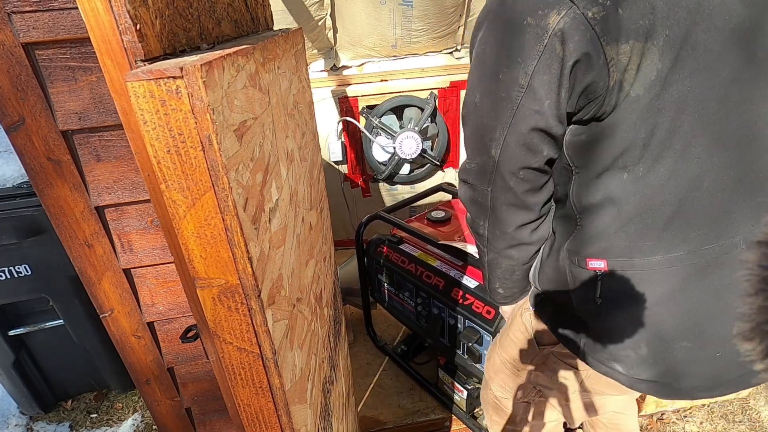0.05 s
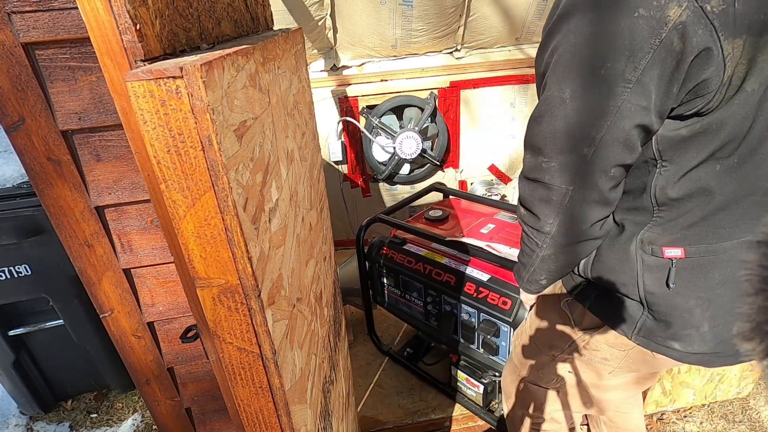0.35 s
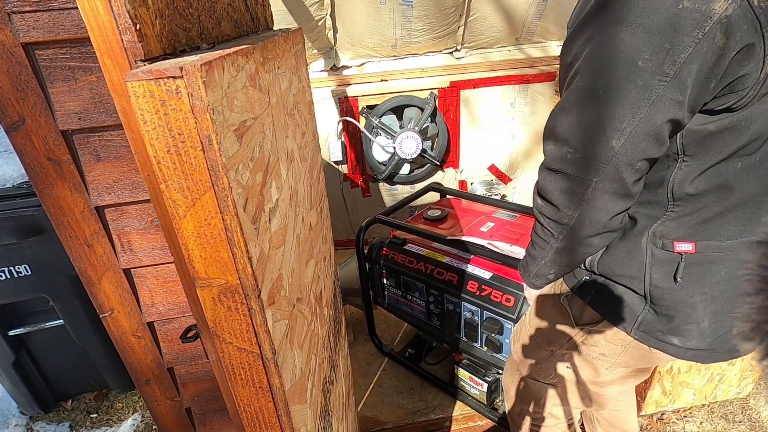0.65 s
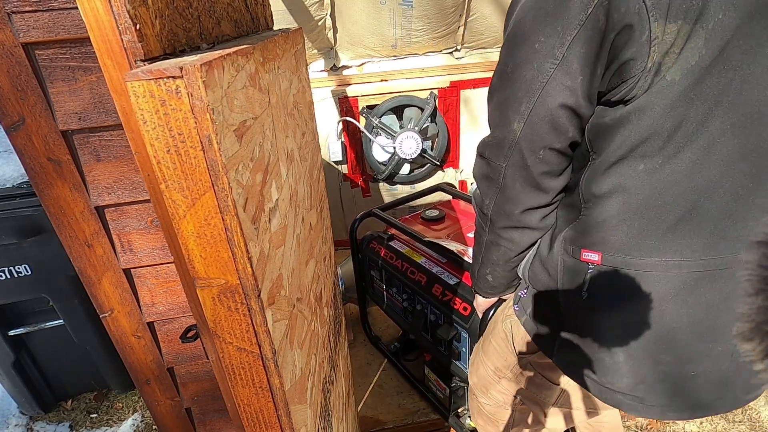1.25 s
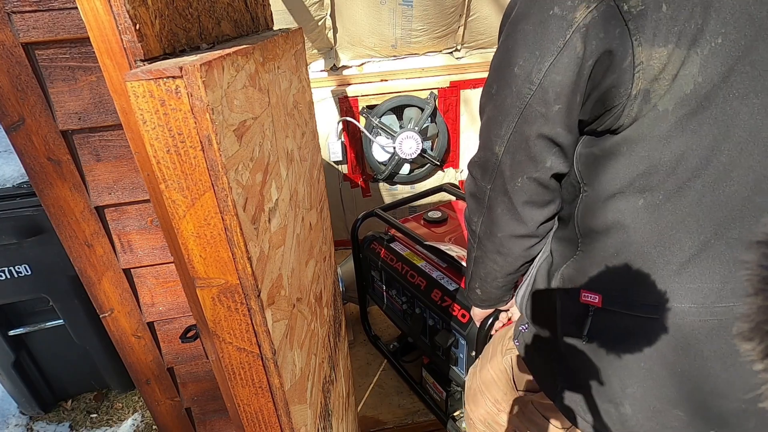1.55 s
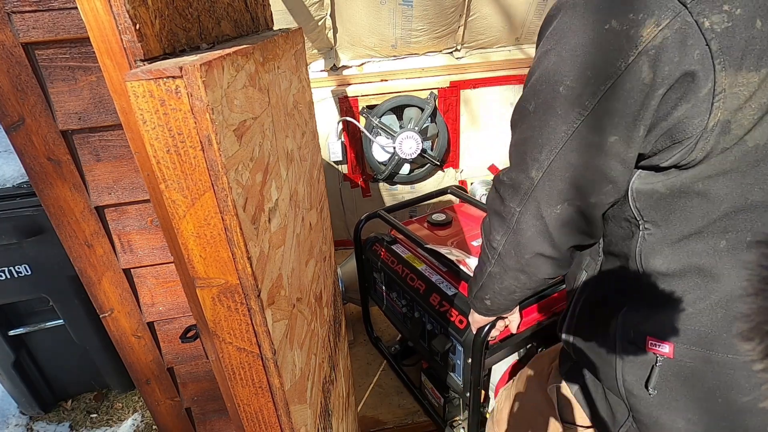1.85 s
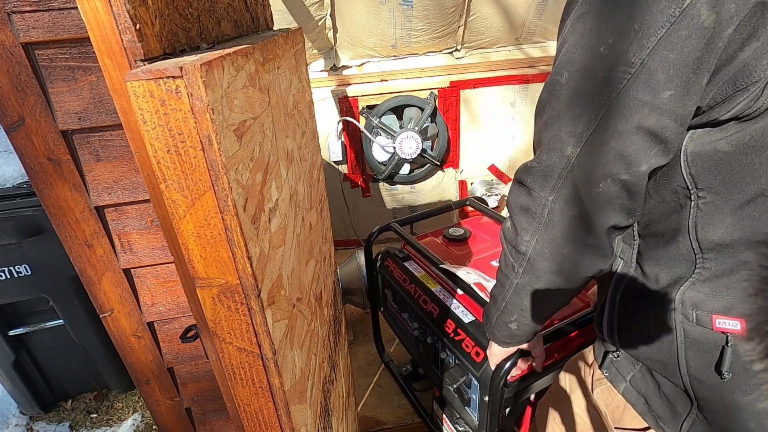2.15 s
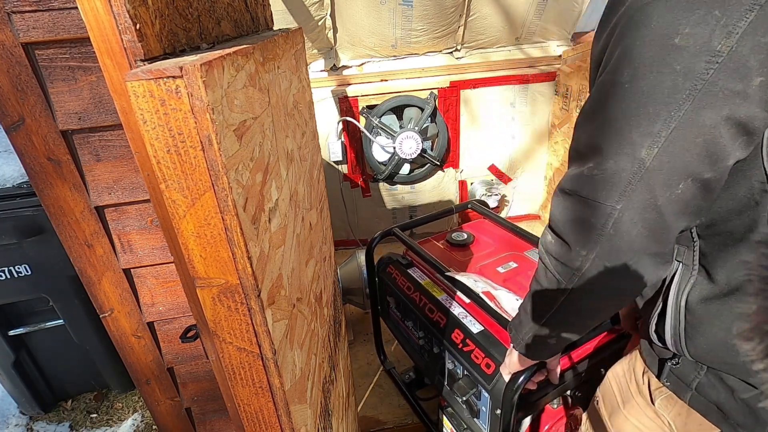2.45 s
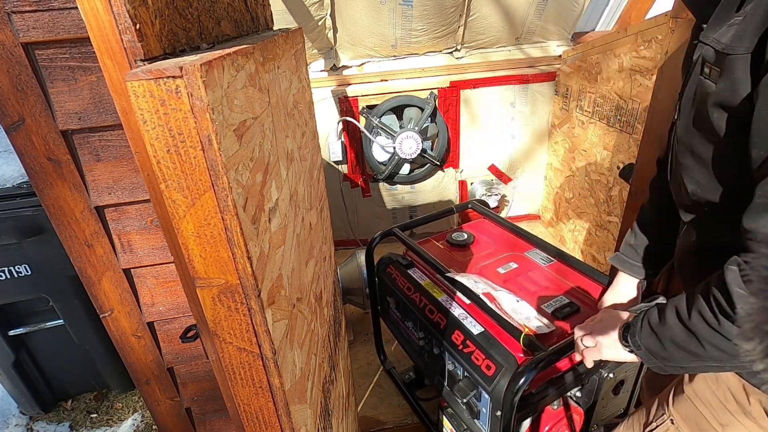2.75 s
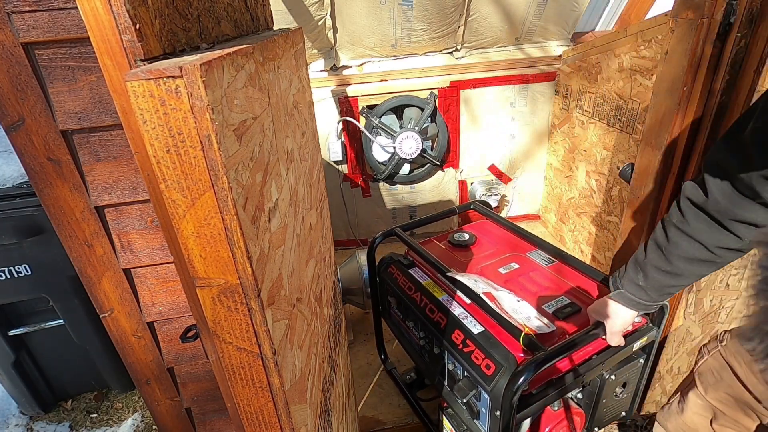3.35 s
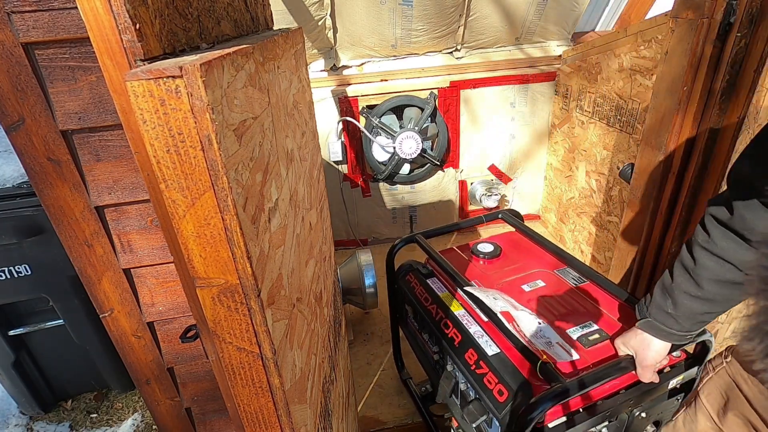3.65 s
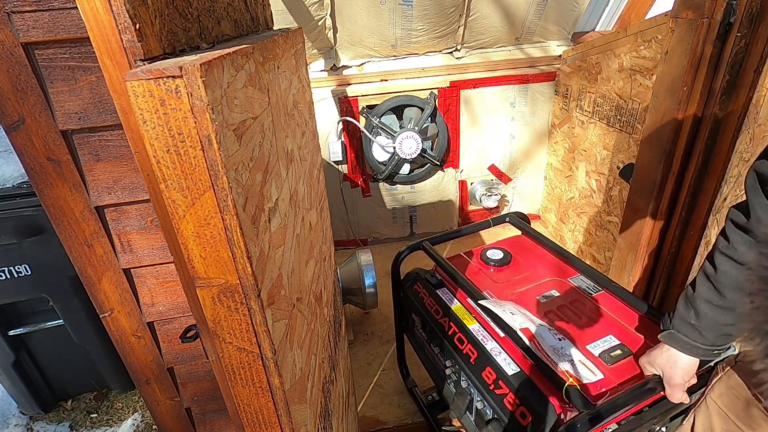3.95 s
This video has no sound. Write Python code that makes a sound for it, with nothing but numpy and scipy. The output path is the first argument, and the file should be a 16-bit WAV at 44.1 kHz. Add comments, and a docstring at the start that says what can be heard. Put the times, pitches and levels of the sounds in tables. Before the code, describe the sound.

A heavy generator is dragged over a gritty wooden floor. Boots shuffle and the steel frame clanks, then comes a loud juddering scrape with a thud, and a softer second drag. Close in a small shed, with light wind.

```python
"""A small shed with a gritty wooden floor, where a heavy portable generator is shifted, then dragged twice. Its
feet stick and slip, juddering on the boards and crushing grit; a tube of the frame squeaks as the first drag
ends. The steel frame clanks and rings hollow, the floor thuds, boots shuffle and scuff, a jacket rustles. The
close walls add a short reverb, and a light wind sways the air at the microphone."""
import sys
import numpy as np
from scipy import signal
from scipy.fft import rfft, irfft, next_fast_len
from scipy.io import wavfile
from scipy.ndimage import uniform_filter1d

SR = 44100
rng = np.random.default_rng(int(sys.argv[2]) if len(sys.argv) > 2 else 0)


def int16_out(signal):
    """Quantize to a 16-bit WAV file."""
    q = np.round(np.clip(np.atleast_2d(signal).T, -1, 1) * 32767)
    wavfile.write(sys.argv[1], SR, q.astype(np.int16))


N = 176400
HIT_SAMPLES, SHARP_ATTACK_S = SR // 3, 0.0003


def amp(db):
    return 10 ** (np.asarray(db) / 20)


def unit(x):
    return x / np.sqrt(np.mean(x ** 2) + 1e-20)


def along(points, hz):
    """Read a curve of (f/Hz, value) points on a log frequency axis."""
    freqs, values = np.transpose(points)
    return np.interp(np.log(hz + 1), np.log(freqs + 1), values)


def coloured(x, colour):
    """Minimum-phase filter whose gain in dB is colour(hz)."""
    size = 2 * next_fast_len(len(x) // 2 + 4096)
    gain = amp(colour(np.fft.rfftfreq(size, 1 / SR)))
    cepstrum = irfft(np.log(gain + 1e-6))
    cepstrum[1:size // 2] *= 2
    cepstrum[size // 2 + 1:] = 0
    return irfft(rfft(x, size) * np.exp(rfft(cepstrum)))[:len(x)]


def eq(x, curve):
    """Filter by a curve of (f/Hz, gain/dB) points."""
    return coloured(x, lambda hz: along(curve, hz))


def hump(hz, centre_hz, steep):
    """A broad resonance in dB."""
    ratio = (hz + 1) / centre_hz
    return -steep * np.log10((ratio + 1 / ratio) / 2)


def swell(s, rise, fall, hold=0, bend=1):
    """An envelope, full from s for the hold, 20 dB down a rise before and a fall after."""
    t = np.arange(N) / SR
    away = np.clip(np.maximum((s - t) / rise, (t - s - hold) / fall), 0, 10)
    return amp(-20 * away ** bend)


def add(track, s, db, hit):
    """Lay a hit at time s; db is its level as if all its energy fell in 20 ms."""
    part = track[int(s * SR):][:len(hit)]
    part += (amp(db) * hit * np.sqrt(SR / 50 / np.sum(hit ** 2)))[:len(part)]


# Decay of the room: f/Hz, t60/s
SHED_DECAY = [(300, 0.15), (14000, 0.054)]
def shed(x, wet_db):
    """Direct sound plus the short answer of the close wooden walls."""
    hz, t, noise = signal.stft(rng.standard_normal(HIT_SAMPLES), SR, nperseg=256)
    decay = amp(-60 * t / along(SHED_DECAY, hz)[:, None])
    tail = signal.istft(noise * decay, SR, nperseg=256)[1]
    tail[:SR // 600] = 0  # pre-delay
    return x + amp(wet_db) * signal.fftconvolve(x, tail / np.linalg.norm(tail))[:len(x)]


def grains(per_s, spread_db, size=N):
    """Random tiny impacts of scattered strength."""
    clicks = (rng.random(size) < per_s / SR) * rng.choice([-1, 1], size)
    return clicks * amp(spread_db * rng.standard_normal(size))


def patter(contacts, colour, wet_db):
    """Several contact points, each with its own path through the shed; rms 1."""
    return unit(coloured(sum(shed(x, wet_db) for x in contacts), colour))


def friction(curve, per_s, spread_db, pressure=1):
    """A rubbing texture: grains under three contact points."""
    contacts = [pressure * grains(per_s, spread_db) for _ in range(3)]
    return patter(contacts, lambda hz: along(curve, hz), wet_db=0)


def burst(per_s, t60, attack_s=SHARP_ATTACK_S):
    """Many tiny impacts that die away."""
    t = np.arange(HIT_SAMPLES) / SR
    return grains(per_s, spread_db=6, size=len(t)) * amp(-60 * t / t60) * (1 - np.exp(-t / attack_s))


def ringing(modes, attack_s):
    """Damped modes, a little different in level and tuning at each blow."""
    t = np.arange(HIT_SAMPLES) / SR
    ring = sum(amp(db + rng.normal(0, 0.66) - 60 * t / t60)
               * np.sin(2 * np.pi * hz * rng.normal(1, 0.011) * t) for hz, db, t60 in modes)
    return ring * (1 - np.exp(-t / attack_s))


# Tone of the air bed and of the wind: f/Hz, gain/dB
AIR_EQ = [(60, 9), (750, 2), (2500, -6), (8000, -11.5), (16000, -12)]
WIND_EQ = [(2, 8.5), (8, -9), (33, -20), (70, -47.5), (600, -105)]
# Slow swells and lulls of the wind: t/s, gain/dB
WIND_SWAY = [(1.0, 2.5), (3.1, -5.5), (3.7, -0.5)]
def breeze(air_db=-50, wind_db=-24.5):
    """A faint bed of air, with slow wind pressure on the microphone underneath."""
    air = unit(eq(rng.standard_normal(N), AIR_EQ))
    wind = unit(eq(rng.standard_normal(N), WIND_EQ))
    gust_db = np.interp(np.arange(N) / SR, *np.transpose(WIND_SWAY))
    return amp(air_db) * air + amp(wind_db + gust_db) * wind


# Blows on the floor: t/s, level/dB, f/Hz
THUD_CUES = [(0.123, -32.5, 254), (0.217, -39.5, 190), (1.66, -39, 178), (1.887, -35, 280),
             (2.162, -20.5, 268.5), (2.174, -20, 83)]
# Low modes of the floor: f/Hz, level/dB, t60/s
FLOOR_MODES = [(53, -3, 0.17), (183.8, -6.5, 0.21)]
def floor_thuds():
    """Dull blows set the floor booming, most when pitched near its upper mode."""
    track = np.zeros(N)
    for s, db, pitch in THUD_CUES:
        blow = coloured(signal.unit_impulse(HIT_SAMPLES), lambda hz: hump(hz, pitch, steep=69))
        add(track, s, db, shed(blow, wet_db=1))
        boom_db = db + 2.5 + hump(FLOOR_MODES[1][0], pitch, steep=170)
        add(track, s, boom_db, ringing(FLOOR_MODES, attack_s=0.0136))
    return track


# Rattles of the frame: t/s, level/dB, ring relative to rattle/dB
CLANK_CUES = [(0.132, -42.5, -6.5), (1.054, -32.5, -22), (1.08, -23.5, -13), (1.11, -27.5, -20),
              (1.643, -53.5, 10), (2.014, -21, -9.5), (2.064, -22, -22), (2.152, -21.5, -27),
              (2.222, -19.5, -13), (3.657, -25.5, -21), (3.82, -29.5, 4)]
# Tone of rattling steel: f/Hz, gain/dB
STEEL_EQ = [(100, -7), (500, 1.5), (1600, -3), (3300, -11), (16000, -22)]
# Modes of the tubes: f/Hz, level/dB, t60/s
TUBE_MODES = [(2460, -2.5, 0.058), (2860, 0, 0.042), (3213, 6, 0.037), (3694, -2, 0.083)]
def frame_clanks():
    """The steel frame rattles, and its tubes ring brightly on top."""
    track = np.zeros(N)
    for s, db, ring_db in CLANK_CUES:
        rattle = eq(burst(per_s=5000, t60=0.085, attack_s=0.00089), STEEL_EQ)
        add(track, s, db, shed(rattle, wet_db=-2))
        tubes = ringing(TUBE_MODES, attack_s=0.0007)
        chatter = burst(per_s=2300, t60=0.05, attack_s=0.0032)
        ring = signal.fftconvolve(tubes, chatter)[:HIT_SAMPLES]
        add(track, s, db + ring_db, shed(ring, wet_db=-2))
    return track


# Arm moves: peak t/s, rise/s, fall/s, level/dB
RUSTLE_CUES = [(0.309, 0.011, 0.05, -48.5), (0.759, 0.04, 0.18, -46.5), (1.812, 0.37, 0.21, -46),
               (2.88, 0.27, 0.46, -50)]
# Sandy hiss, for cloth and for sand underfoot: f/Hz, gain/dB
SAND_EQ = [(200, 10), (900, -3.5), (2500, 4), (8000, -3.5), (16000, -10.5)]
def jacket_rustles():
    """Stiff cloth slides over itself with a fine hiss."""
    envelope = sum(amp(db) * swell(s, rise, fall) for s, rise, fall, db in RUSTLE_CUES)
    return envelope * friction(SAND_EQ, per_s=2100, spread_db=10)


# Weight shifts: peak t/s, rise/s, fall/s, boards level/dB, sand level/dB
SHUFFLE_CUES = [(0.49, 0.16, 0.21, -36, -43), (0.96, 0.16, 0.14, -42, -44), (1.18, 0.54, 0.27, -37, -44.5),
                (1.369, 0.067, 0.04, -39.5, -39.5), (1.504, 0.12, 0.13, -32, -44.5)]
# Tone of rubbed boards: f/Hz, gain/dB
BOARD_EQ = [(60, -2.5), (230, 1), (650, -3.5), (1400, -14), (12000, -30.5)]
def shuffles():
    """Small shifts of weight rub the boards and roll sand over them."""
    boards = friction(BOARD_EQ, per_s=230, spread_db=6)
    sand = friction(SAND_EQ, per_s=1100, spread_db=7)
    return sum(swell(s, rise, fall, bend=1.92) * (amp(boards_db) * boards + amp(sand_db) * sand)
               for s, rise, fall, boards_db, sand_db in SHUFFLE_CUES)


# Breaking grit: t/s, level before trim/dB, crumble t60/s, f/Hz
CRACK_CUES = [(0.413, -36.5, 0.013, 3280), (0.473, -33.5, 0.016, 3870), (0.509, -33, 0.032, 3850),
              (0.716, -37, 0.022, 11000), (0.909, -33.5, 0.014, 4930), (0.978, -26.5, 0.029, 2900),
              (1.08, -29.5, 0.046, 1670), (1.415, -29.5, 0.17, 7600), (1.529, -32.5, 0.021, 2840),
              (1.643, -33.5, 0.0168, 3800), (1.975, -38, 0.0045, 5000), (2.228, -20.5, 0.14, 6500),
              (2.286, -22, 0.049, 6950), (2.477, -34.5, 0.0028, 6500), (2.781, -41, 0.0049, 1390),
              (3.163, -36.5, 0.025, 9100), (3.47, -36.5, 0.0194, 6600)]
def grit_cracks(trim_db=-4.5):
    """Grit breaks under the load: a sharp snap, then a tail of crumbs."""
    track = np.zeros(N)
    snap = 2 * signal.unit_impulse(HIT_SAMPLES)
    for s, db, crumble_s, pitch in CRACK_CUES:
        colour = lambda hz: hump(hz, pitch, steep=29) - 10 * np.log10(1 + (hz / 9000) ** 2)
        crack = coloured(snap + burst(per_s=6500, t60=crumble_s), colour)
        add(track, s, db + trim_db, shed(crack, wet_db=-0.5))
    return track


# Body of the frame on the boards: f/Hz, width/Hz, level/dB
FRAME_MODES = [(335.6, 28, 2.5), (417, 106, 4), (540, 50, -3.5), (715, 100, 0), (937, 35, -9),
               (1227, 92, -5)]
def frame_db(hz):
    """The hollow resonances of the frame as a gain in dB."""
    power = sum(amp(2 * db) * (hz * width) ** 2 / ((centre ** 2 - hz ** 2) ** 2 + (hz * width) ** 2)
                for centre, width, db in FRAME_MODES)
    return 10 * np.log10(1e-6 + power)


# Jolts of the whole frame: t/s, level/dB
JOLT_CUES = [(1.084, -22.5), (1.111, -23.5), (2.093, -16.5), (2.16, -21.5), (3.449, -39), (3.582, -25),
             (3.665, -23.5), (3.712, -25.5), (3.805, -31)]
def frame_jolts(cutoff_hz=610):
    """The jolted frame rings hollow; its rubber feet pass little above the cutoff."""
    track = np.zeros(N)
    muffled = lambda hz: frame_db(hz) - 10 * np.log10(1 + (hz / cutoff_hz) ** 4)
    for s, db in JOLT_CUES:
        jolt = coloured(burst(per_s=2300, t60=0.047), muffled)
        add(track, s, db, shed(jolt, wet_db=-3))
    return track


# Boot slides: peak t/s, rise/s, fall/s, level/dB
SCUFF_CUES = [(1.488, 0.033, 0.031, -25.5), (2.678, 0.063, 0.028, -34), (3.313, 0.24, 0.07, -33),
              (3.441, 0.051, 0.03, -33.5)]
# Tone of a sole: f/Hz, gain/dB
SOLE_EQ = [(100, -15.5), (600, -2), (1350, 0), (3000, -9), (16000, -18.5)]
def boot_scuffs():
    """A sole slides faster and then grips."""
    envelope = sum(amp(db) * swell(s, rise, fall, bend=1.14) for s, rise, fall, db in SCUFF_CUES)
    return envelope * friction(SOLE_EQ, per_s=2300, spread_db=5.5)


def slips(per_s, scatter, spread_db, count=2000):
    """Stick and slip: kicks at an uneven rate."""
    gaps = np.exp(scatter * rng.standard_normal(count))
    at = (np.cumsum(gaps) * SR / per_s).astype(int)
    kicks = amp(spread_db * rng.standard_normal(count))
    return np.bincount(at[at < N], kicks[at < N], N)


# Drags: full speed t/s, hold/s, rise/s, fall/s, rumble level/dB, judder level/dB, grit level/dB
DRAG_CUES = [(2.038, 0.27, 0.12, 0.18, -27.5, -24.5, -26.5), (3.584, 0.19, 0.12, 0.27, -40, -29, -29)]
# Tone of the floor rumble and of the grinding grit: f/Hz, gain/dB
RUMBLE_EQ = [(58, -10.5), (78, -9.5), (190, 1), (300, -12.5), (1500, -43)]
GRIT_EQ = [(150, -18), (600, -6), (1300, -2.5), (3300, -2), (5000, -8), (16000, -17)]
def generator_drags(steady_load=1.38, catch_load=1.53, catch_s=0.021):
    """The feet judder, shaking floor and frame, and grind grit harder at each slip and catch."""
    feet = [slips(per_s=90, scatter=0.6, spread_db=2) for _ in range(2)]
    slip_load = signal.lfilter([1], [1, -np.exp(-1 / (0.0085 * SR))], sum(feet))  # 8.5 ms release
    # the feet dig in at each clank
    catches = sum(swell(s, SHARP_ATTACK_S, catch_s, hold=catch_s) for s, *_ in CLANK_CUES)
    pressure = steady_load + slip_load + catch_load * catches
    rumble = friction(RUMBLE_EQ, per_s=200, spread_db=8.5)
    judder = patter(feet, frame_db, wet_db=1)
    grit = friction(GRIT_EQ, per_s=2000, spread_db=0, pressure=pressure)
    track = np.zeros(N)
    for s, hold, rise, fall, rumble_db, judder_db, grit_db in DRAG_CUES:
        blend = amp(rumble_db) * rumble + amp(judder_db) * judder + amp(grit_db) * grit
        track += swell(s, rise, fall, hold, bend=1.49) * blend
    return track


# A tube's chirp: peak t/s, half length/s, f at peak/Hz, glide/(Hz/s), level/dB
SQUEAK_CUE = (2.496, 0.024, 870, 6000, -40.5)
def tube_squeak():
    """A tube of the frame squeaks as the first drag ends: a short, rough, rising chirp."""
    s, half_s, hz, glide, db = SQUEAK_CUE
    t = np.arange(N) / SR - s
    flutter = unit(uniform_filter1d(rng.standard_normal(N), size=200))
    chirp = np.sin(2 * np.pi * (hz + glide * t / 2) * t + flutter)
    envelope = amp(db) * np.exp(-(t / half_s) ** 2)
    return shed(envelope * chirp, wet_db=-6.5)


def scene():
    """The mono mix: friction layers and hits over the breeze."""
    rubs = generator_drags() + shuffles() + boot_scuffs() + tube_squeak() + jacket_rustles()
    hits = floor_thuds() + frame_jolts() + frame_clanks() + grit_cracks()
    return (rubs + hits + breeze())[None]


# Microphone response: f/Hz, gain/dB
MIC_EQ = [(4600, 0.5), (6200, -3.5), (8200, 2.5), (10300, -8), (12800, -3), (15500, -6.5)]
TOP_HZ = 15850
def record(dry):
    """The microphone ripples the treble and keeps nothing above its band limit."""
    size = next_fast_len(N + SR // 2)
    spectrum = rfft(eq(dry[0], MIC_EQ), size)
    in_band = np.fft.rfftfreq(size, 1 / SR) < TOP_HZ
    return irfft(spectrum * in_band, size)[None, :N]


dry = scene()
out = record(dry)
int16_out(out)
```